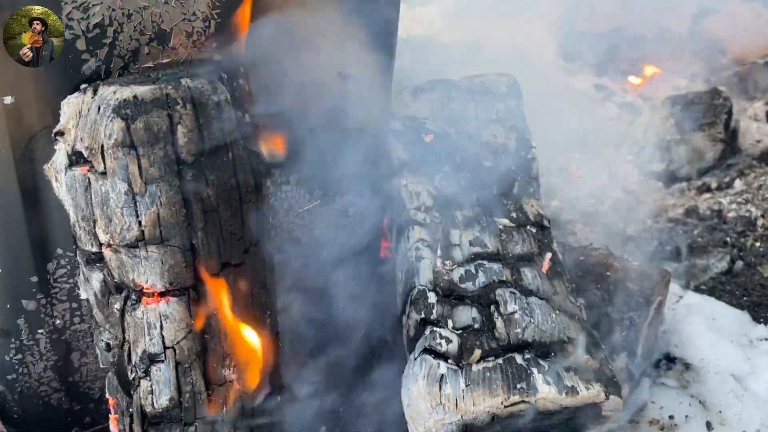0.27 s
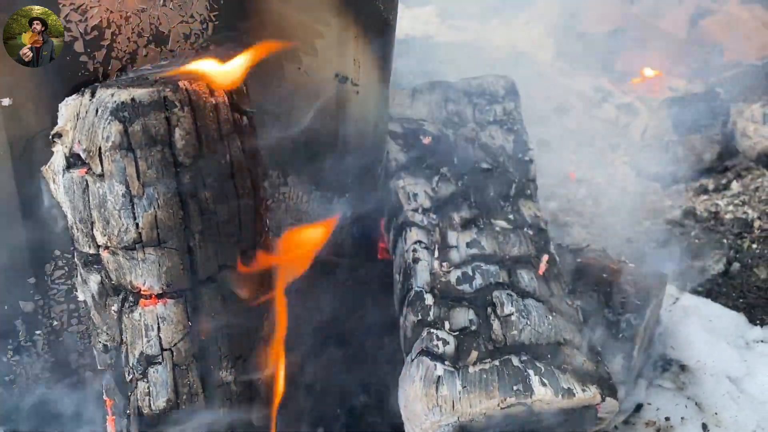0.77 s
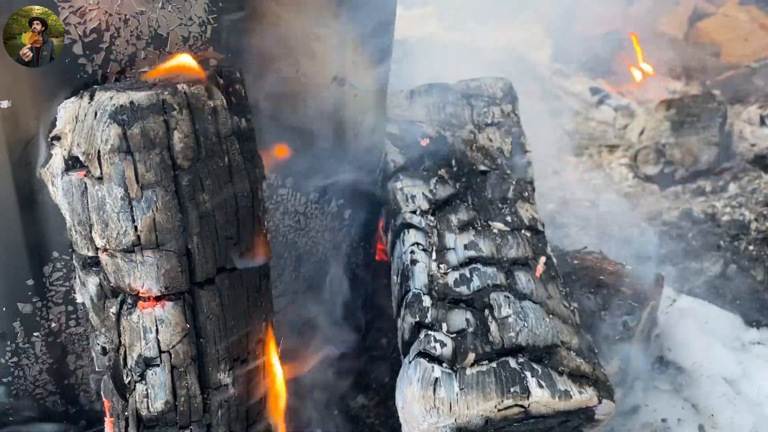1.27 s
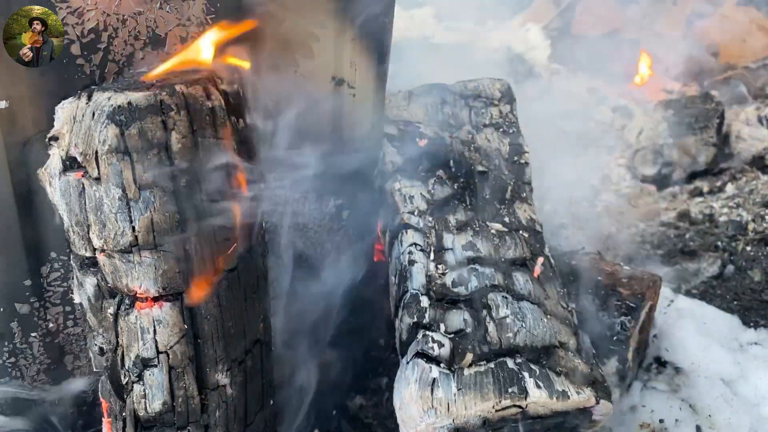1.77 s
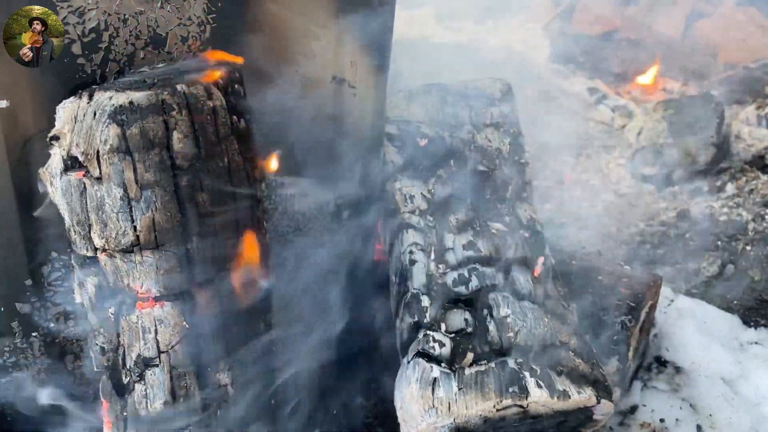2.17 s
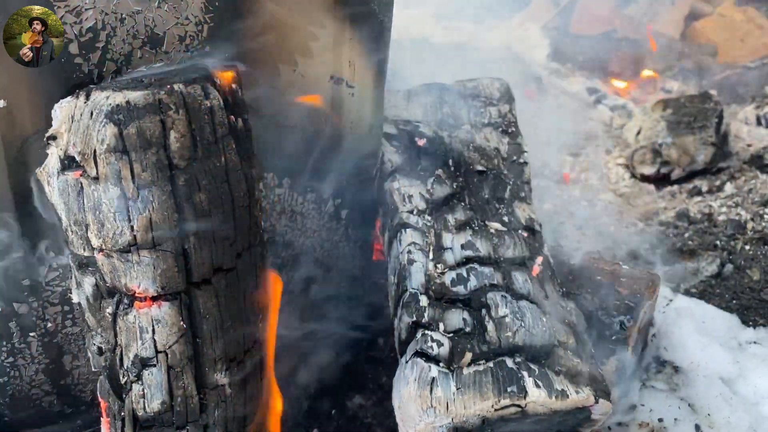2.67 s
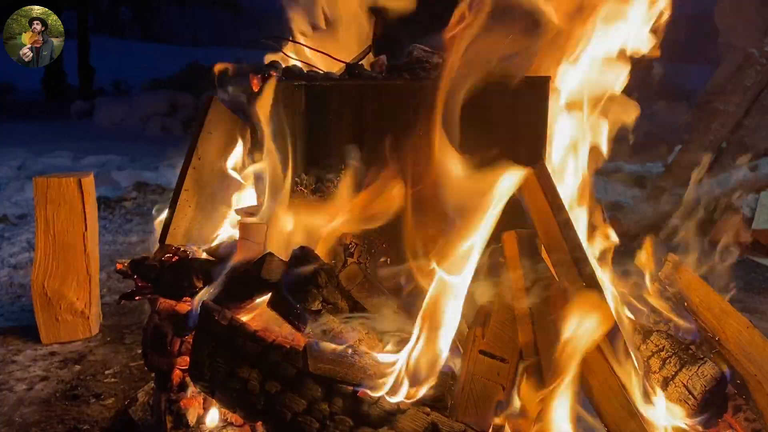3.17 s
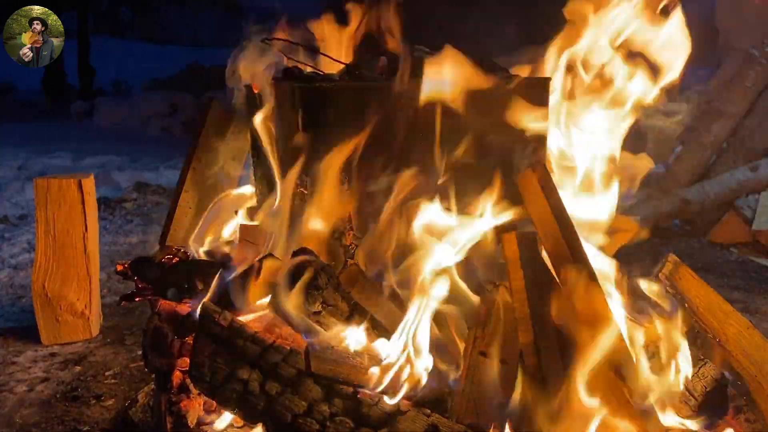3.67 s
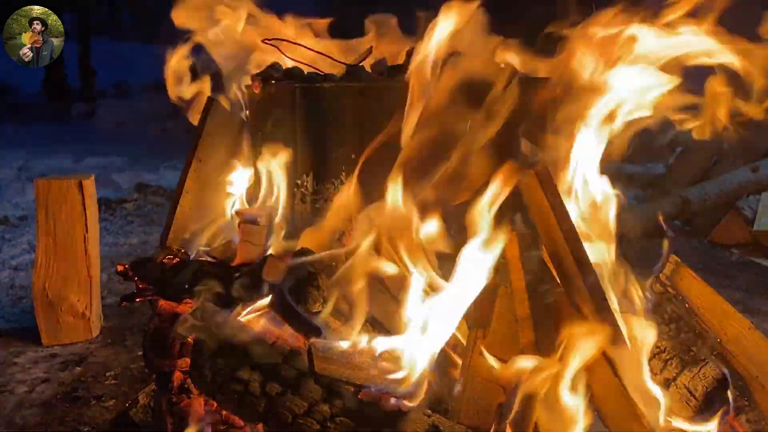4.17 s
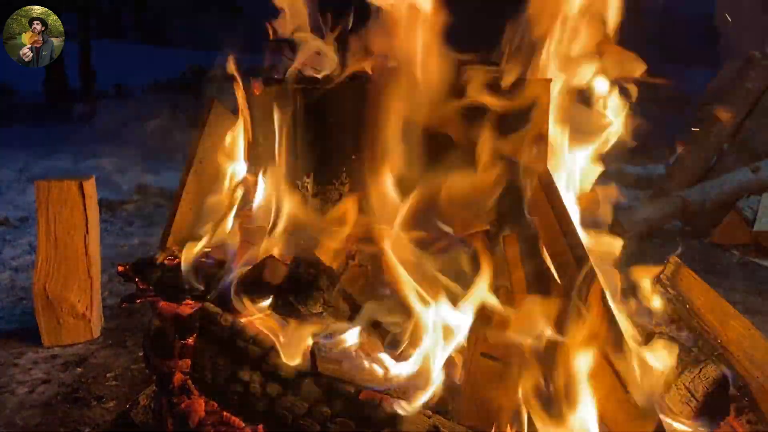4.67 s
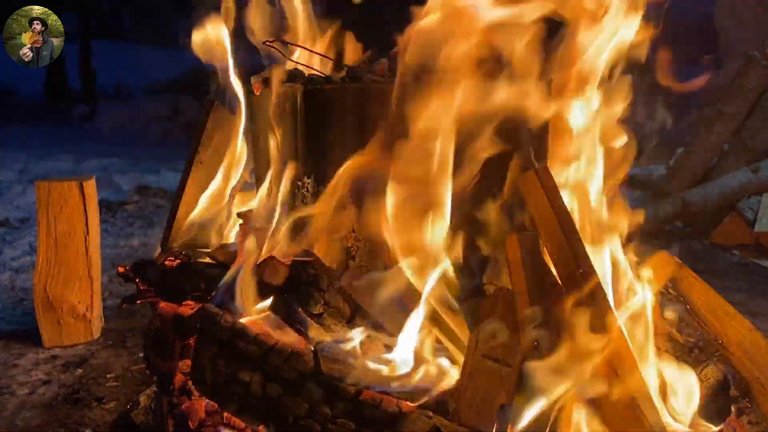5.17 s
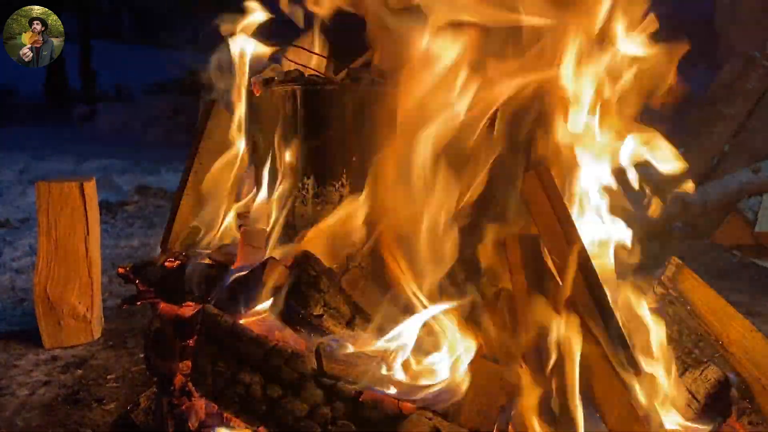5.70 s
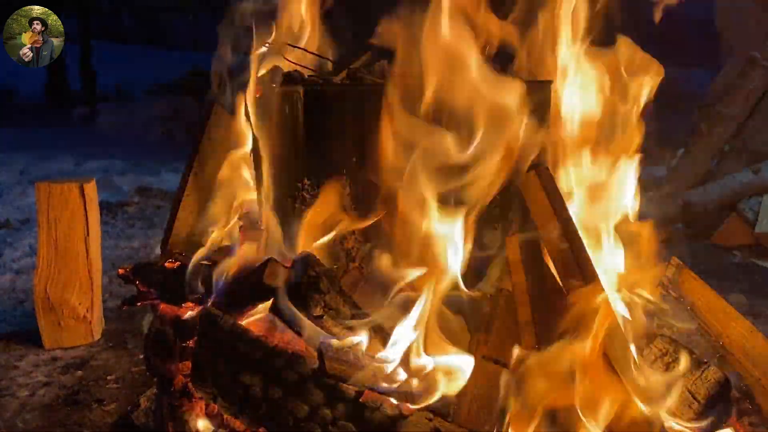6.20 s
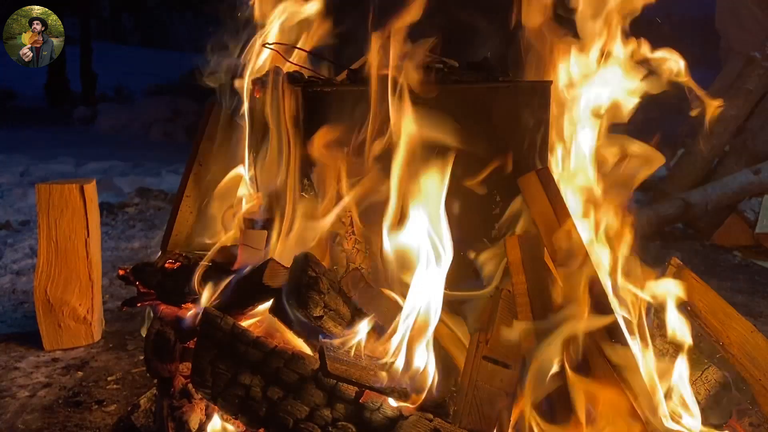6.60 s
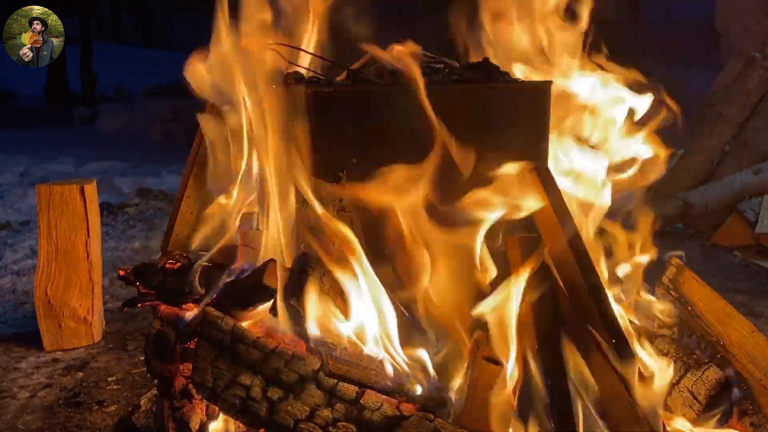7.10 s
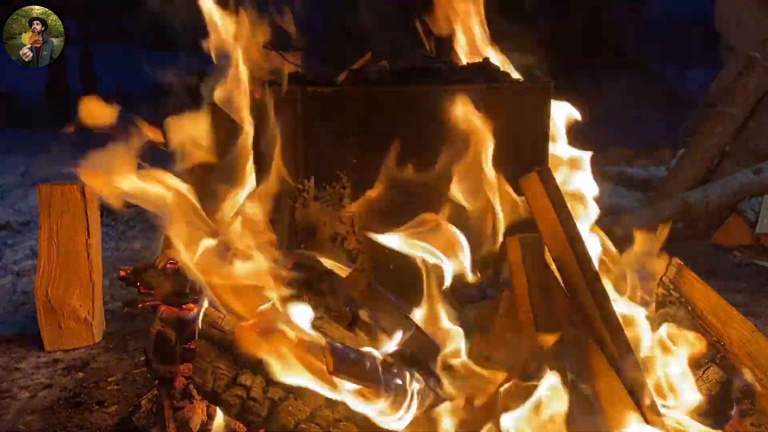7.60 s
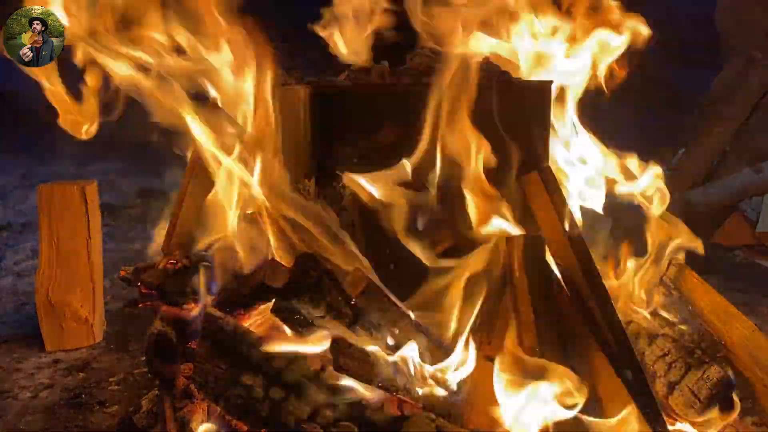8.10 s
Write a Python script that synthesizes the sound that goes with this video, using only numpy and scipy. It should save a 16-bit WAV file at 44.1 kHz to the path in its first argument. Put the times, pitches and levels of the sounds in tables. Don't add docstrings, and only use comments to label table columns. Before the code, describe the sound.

Smouldering logs give low fluttering rumble and sparse dry crackles, then an abrupt change to a louder full blaze with sharp pops and metallic knocks.

```python
import sys
import numpy as np
from scipy import signal
from scipy.fft import rfft, irfft, next_fast_len
from scipy.io import wavfile
from scipy.ndimage import uniform_filter1d

SR = 44100
rng = np.random.default_rng(int(sys.argv[2]) if len(sys.argv) > 2 else 0)


def how_loud(loudness_db):
    steps = np.asarray(loudness_db, float) / 20
    return 10 ** steps


def master(y):
    cut = np.clip(np.atleast_2d(y).T, -1, 1)
    pcm = np.round(cut * 32767)
    wavfile.write(sys.argv[1], SR, pcm.astype(np.int16))


N = 368182

# start in seconds, end in seconds.
PLACES_S = [
    (0, 3.104),
    (3.115, 8.35),
]
# time in seconds, level in dB.
SAP_LEVEL = [
    [(0.0, -65.5), (0.8, -66.5), (2.4, -66), (2.71, -67.5), (3.1, -64.5)],
    [(3.12, -63.5), (3.48, -61.5), (4.75, -61), (5.1, -62.5), (6.18, -59.5), (7.15, -60), (7.3, -56),
     (7.65, -62), (7.95, -60.5), (8.12, -54.5), (8.21, -62.5), (8.35, -62.5)],
]
# frequency in Hz, density in dB per Hz.
RUMBLE_SPECTRUM = [
    [(12, -62), (20, -19), (53, 3.5), (70, 8), (83, 2), (108, 5.5), (200, -8), (260, -55), (440, -120)],
    [(12, -42), (20, -49), (48, -1.5), (70, 4.5), (135, -5), (200, -15.5), (260, -24), (440, -120)],
]
EDGE_SPECTRUM = [
    [(90, -28), (160, -1), (260, -2.5), (430, -14), (600, -19), (950, -42.5), (1600, -36), (2500, -47)],
    [(90, 0.5), (160, 2), (260, -3.5), (430, -11), (600, -16), (1000, -21.5), (1500, -28), (2500, -33),
     (4000, -74)],
]
HISS_SPECTRUM = [
    [(500, -12), (1000, -7.5), (1500, -7.5), (2200, -3.5), (3100, -1.5), (4700, 1), (6300, 4), (7500, -2),
     (9000, 5), (11000, -0.5), (15760, 0.5), (15880, -55.5)],
    [(700, 3), (1500, 1.5), (2100, -2.5), (3100, 3.5), (3900, 1.5), (4700, 4), (6500, -0.5), (8000, 3.5),
     (11000, 1), (15760, 4), (15880, -56)],
]
# frequency in Hz, width in Hz, boost in dB.
BOX_HUM = [(744, 80, 4.), (1011, 60, 6.), (1233, 75, 3.)]
# frequency in Hz, left-right likeness 0-1, left lead in radians.
PORT_MATCH = [
    [(89, 1, 0.43), (463, 0.75, -0.59), (1010, 0.47, 1.57), (1650, 0.95, 2), (2360, 1, 1.3),
     (4470, 0.3, 0.87), (5800, 1, 1.37), (10000, 0.85, 0.058)],
    [(39, 1, 0.16), (147, 0.99, 0.061), (634, 0.98, 0.69), (1190, 0.88, 0.49), (1380, 0.1, 0.96),
     (2900, 0.7, 0.98), (4810, 0.68, 0.91), (5700, 0, 1.8), (7260, 0.91, 0.2)],
]
# frequency in Hz, left over right in dB.
LEFT_LEAN = [
    [(300, 0.5), (950, 1), (1550, 0.3), (3000, 6.5), (6200, 0.3)],
    [(100, -0.5), (430, -2), (800, 2), (1050, 1), (4400, 4), (6200, 1)],
]
# start in seconds, peak in dB, pitch in Hz, decay in cycles.
PUFFS = [(0.234, -35, 100, 3.2), (0.264, -34, 63, 8.1), (0.637, -31, 67, 5), (0.8, -21.5, 56.4, 1.9),
         (0.953, -20, 45.8, 1.4), (0.955, -16.5, 79, 3), (1.055, -17.5, 67, 2.9), (1.304, -30, 102, 2.2),
         (1.564, -34, 120, 2.9), (1.924, -38, 115, 3.7), (2.157, -24.5, 63.3, 1.5), (2.302, -34, 127, 2.5),
         (2.622, -32, 157, 5.1), (2.842, -28, 111, 3.6), (3.119, -27, 47, 0.83), (3.12, -32, 64, 1.4),
         (3.935, -21, 82, 1.9), (4.329, -22, 62, 2.2), (4.549, -37, 91.5, 4.3), (5.881, -20.5, 67, 3.4),
         (6.017, -42, 103, 3), (6.639, -15.5, 83.5, 2.1), (6.91, -11.5, 77.5, 1.8),
         (7.249, -14.5, 80, 1.95), (7.559, -16, 82, 3), (8.239, -19, 66.6, 0.82)]
# start in seconds, peak in dB, favoured pitch in Hz, splinters in dB.
KNOCKS = [
    (3.5745, -33.5, 1250, -20),
    (4.8494, -34, 1050, -8),
    (4.8582, -21.5, 1060, -11),
    (5.145, -17.5, 3500, -14),
    (5.1457, -29.5, 950, -10),
    (5.1487, -23, 960, -12.5),
    (6.222, -37.5, 1100, 1.5),
    (6.529, -44, 1500, -12),
    (7.195, -39, 1620, -28),
    (7.785, -39.5, 800, -1.5),
]
# frequency in Hz, level in dB, 60 dB decay in seconds.
BOX_MODES = [(740, 2.5, 0.044), (1010, 3.5, 0.032), (1215, -7, 0.043), (1700, -11.5, 0.078),
             (2600, -11, 0.042), (3430, -1, 0.017), (3900, -2, 0.013), (5320, -6, 0.018), (7400, -22, .012)]
# start in seconds, peak in dB, sharpness in dB.
LOG_TEARS = [(.025, -40, -18.5), (.24, -42, -26.5), (.31, -46, -18), (.366, -40, -28), (.444, -43, -26.5),
             (2.05, -48, -23), (2.352, -41, -12.5), (0.293, -62, -16), (0.417, -32.5, -22.5),
             (0.7, -39, -15), (0.746, -42, -19.5), (0.936, -44, -22.5), (1.086, -25, -50),
             (1.174, -35, -26), (1.314, -26.5, -26), (1.358, -36.5, -18.5), (1.559, -42, -19),
             (1.699, -39, -24.5), (1.776, -46, -5.5), (1.822, -42.5, -12), (1.886, -42.5, -21),
             (1.918, -41, -8), (2.112, -43, -9), (2.255, -36.5, -24), (2.306, -30, -21),
             (2.327, -29.5, -11.5), (2.637, -44, -18.5), (2.845, -39.5, -18.5)]
# start in seconds, peak in dB, sharpness in dB.
BLAZE_TEARS = [(3.161, -42.5, -19), (3.213, -42, -18), (3.345, -34.5, -16.5), (3.469, -41, -18),
               (3.558, -35.5, -18), (3.617, -43, -17), (3.709, -39.5, -18), (3.812, -42, -18),
               (3.878, -47, -17), (4.069, -38, -17.5), (4.112, -40.5, -17.5), (4.149, -46, -16),
               (4.169, -42, -19.5), (4.333, -43, -17), (4.404, -33, -17.5), (4.5, -37.5, -16.5),
               (4.945, -46, -15.5), (4.995, -39, -20.5), (5.076, -47, -20), (5.391, -40, -18),
               (5.469, -43.5, -18), (5.694, -42, -17), (6.057, -37.5, -17.5), (6.565, -37, -19),
               (6.842, -39.5, -18), (7.665, -44, -18.5), (8.102, -32.5, -16), (8.138, -40, -17.5)]
# start in seconds, peak in dB, sharpness in dB.
FAINT_TEARS = [(0.336, -51, -22.5), (0.475, -54, -21), (1.038, -47.5, -23), (1.287, -59, -25),
               (2.496, -51, -25), (2.532, -49, -24), (2.564, -45, -24.5), (2.733, -59, -26),
               (2.769, -61, -25), (2.899, -55, -24.5), (2.95, -55, -24), (3.056, -50, -25)]
# start in seconds, length in seconds, level in dB, spectrum of frequency in Hz and density in dB.
STEAM_JET = (.525, 0.28, -60, [(400, -20), (700, -4), (820, -1), (1000, -13), (1600, -13), (2500, -27)])
# rumble in dB, ragged edge in dB.
CALM_DB = [
    (-59, -77),
    (-43, -49.5),
]
# middle in seconds, half length in seconds, rumble in dB, edge over rumble in dB.
GUSTS = [(0.015, 0.057, -43, -9.5), (0.256, 0.025, -49, -2), (0.374, 0.1, -45, -7),
         (0.533, 0.064, -49.5, -4.5), (0.74, 0.09, -49, -7.5), (0.94, 0.045, -36, -22),
         (1.103, 0.065, -34.5, -22.5), (1.325, 0.057, -48, -2), (1.572, 0.027, -48.5, -1.5),
         (1.746, 0.11, -55, -5), (2, 0.13, -59.5, -8), (2.16, 0.07, -48, -6.5), (2.335, 0.051, -50.5, 3.5),
         (2.403, 0.023, -41.5, -12), (2.582, 0.11, -59, 3.5), (2.858, 0.077, -48.5, -7),
         (3.103, 0.06, -54.5, -6), (3.345, 0.04, -37.5, -15.5), (3.643, 0.13, -46.5, -4),
         (3.952, 1, -50, -7), (4.385, 0.08, -51.5, 2), (4.737, 0.15, -50, -24), (5.035, 0.19, -45.5, -8),
         (5.336, 0.06, -48.5, -4), (5.695, 0.053, -40.5, -14.5), (6.123, 0.25, -40.5, -13),
         (6.746, 0.22, -42.5, -16.5), (7.188, 0.18, -47.5, -43), (7.57, 0.086, -41.5, -9.5),
         (7.728, 0.052, -42.5, -5.5), (8.226, 0.19, -48, -5.5)]
# start in seconds, peak in dB, low and high share in dB over the middle, cell pitch in Hz.
LOG_SNAPS = [(.0882, -35.5, -6, -11, 1630), (.0888, -27.5, -18, -9, 6580), (.2248, -31.5, -16, 3, 7170),
             (.31, -31.5, -39, -12, 6170), (.3738, -26, -20, 6, 7730), (.434, -29.5, -8, 7, 7900),
             (.602, -34, 6, 15, 9000), (.863, -34, -21, 2, 5400), (.8765, -23.5, -31, -10.5, 7640),
             (1.272, -23, -30, 6, 6940), (1.5132, -27, -13, 6, 3800), (1.5176, -26.5, -30, 5, 10000),
             (1.5274, -21, -19.5, -15.5, 7100), (1.5602, -32, -11, -25, 3630),
             (1.5823, -36.5, -8, -5, 7500), (2.0038, -34, -19, 6, 5440), (2.0692, -31, -11, -9, 3060),
             (2.1807, -22.5, -10.5, -4.5, 6590), (2.34, -26.5, -56, -7, 7370),
             (2.4029, -29.5, -20, 12, 6960), (2.4517, -30.5, -34, -7, 6770), (2.907, -28.5, -15, 2, 4520),
             (3.0375, -35.5, -6, -8, 6590)]
# start in seconds, peak in dB, low and high share in dB over the middle, cell pitch in Hz.
BLAZE_SNAPS = [(3.347, -17, -2.5, -7, 5650), (3.4024, -23.5, 3.5, 7.5, 1840), (3.779, -13.5, 1.5, -6, 2750),
               (4.0347, -24.5, -9, -7, 6800), (4.07, -19, 0.5, -8, 6400), (4.277, -27.5, -3, 12, 1660),
               (4.29, -34, -2, -36, 4470), (4.414, -24.5, -19, 1, 3640), (4.5012, -22.5, 3, -1.5, 6400),
               (4.8358, -14.5, -9, -3.5, 15200), (4.8571, -26.5, -16, -9, 3000),
               (5.146, -21.5, -6, 4, 3700), (5.2585, -18.5, -3, 3.5, 5300), (5.304, -30.5, -18, -11, 4370),
               (5.3873, -31, -11, -19, 7300), (5.73, -16, -0.5, 2, 3860), (5.7475, -19, -1.5, 8, 7430),
               (5.951, -24, -13, -0.5, 5320), (6.0764, -24.5, -8, -3.5, 3380), (6.379, -20.5, -27, 0, 4490),
               (6.4517, -28, -17, -14, 3000), (6.5281, -27, 7, -11.5, 6550), (6.8061, -11.5, -1, 0.5, 7400),
               (6.8592, -21, -3, 5, 7200), (7.1517, -25.5, -11, -8.5, 3960), (7.455, -26, 9, 2.5, 5000),
               (8.104, -15.5, -1, -4.5, 3030)]
# start in seconds, peak in dB, cell pitch in Hz.
BLAZE_TICKS = [(3.202, -34, 2570), (3.274, -33, 7600), (3.29, -31.5, 2720), (3.388, -42, 5220),
               (3.501, -30, 7790), (3.559, -44, 1960), (3.632, -33, 4280), (3.758, -36, 3070),
               (3.818, -36, 2540), (3.906, -43, 4910), (4.0577, -37, 5000), (4.164, -33.5, 4520),
               (4.553, -33, 3900), (4.635, -31, 3500), (4.756, -28, 6900), (4.777, -29, 3820),
               (4.822, -26, 6380), (4.8403, -24, 6500), (5.081, -33.5, 3630), (5.445, -31.5, 4560),
               (5.717, -28, 7420), (5.779, -29, 7570), (5.811, -30, 9000), (5.8688, -31.5, 1920),
               (5.891, -31, 3550), (6.029, -35, 2820), (6.056, -37, 2060), (6.1026, -31, 3120),
               (6.186, -40, 4390), (6.2256, -34, 3970), (6.25, -33, 7500), (6.27, -26, 4300),
               (6.358, -31, 7820), (6.634, -26, 4810), (6.6555, -30, 7850), (6.7238, -29, 9000),
               (6.7446, -26.5, 7540), (6.766, -29.5, 4280), (6.8807, -30.5, 3500), (6.916, -34, 4550),
               (6.95, -36.5, 3180), (7.095, -37, 1570), (7.137, -40, 4450), (7.357, -29.5, 7520),
               (7.443, -30, 2490), (7.532, -35, 2940), (7.541, -29, 10000), (7.547, -30.5, 2600),
               (7.598, -28.5, 2440), (7.654, -33, 2430), (7.701, -44, 7290), (7.7383, -34, 5000),
               (7.748, -29, 11000), (7.785, -34, 5000), (7.797, -40, 2500), (7.851, -29.5, 7540),
               (7.973, -37, 7310), (8.035, -33, 1700), (8.1648, -32.5, 6000)]
# start in seconds, peak in dB, cell pitch in Hz.
EMBER_TICKS = [(.1335, -50, 6040), (.157, -43, 4850), (.2, -49, 6060), (0.3494, -35, 7360),
               (.5625, -44, 7820), (.582, -43, 6110), (.909, -40, 4890), (1.153, -41, 6210),
               (1.185, -37, 4390), (1.349, -43, 6250), (1.441, -39, 6610), (1.468, -40, 4760),
               (1.598, -35, 7500), (1.927, -36.5, 2490), (2.027, -54, 3000), (2.0688, -44, 4150),
               (2.11, -36, 4590), (2.12, -37, 2700), (2.169, -32, 8500), (2.188, -33, 5000),
               (2.2185, -39, 6270), (2.247, -42, 4780), (2.293, -43, 3000), (2.552, -35, 6470),
               (2.597, -44, 5620), (2.696, -47, 6960)]
FIZZ_HZ = [2000, 4000, 7500, 13000]

EDGE_HZ = 16750
TURN_HZ, LAG_SAMPLES = 1.5 * SR / 10, 10
TICK_LOW_DB, TICK_HIGH_DB, TICK_DULL_DB_PER_OCT = -5, 0.5, 4
CELL_DB, CELL_WIDTH_OCT, CELL_LOW_DB_PER_OCT = 4, 0.23, 2
SHOCK = 1.35
SWING_UP_CYCLES = 0.2
TEAR_LIFT_DB, TEAR_ROUGH = 6, 0.55


def evened(x):
    return x / np.sqrt(np.mean(x ** 2) + 1e-20)


def read(points, hz, column=1):
    table = np.array(points, float)
    return np.interp(np.log(hz + 1), np.log(table[:, 0] + 1), table[:, column])


def add(mix, start_s, sound):
    part = mix[..., max(round(start_s * SR), 0):][..., :sound.shape[-1]]
    part += sound[..., :part.shape[-1]]


def flicker(count, corner_hz):
    hz = np.fft.rfftfreq(count, 1 / SR)
    shape = hz / (hz + 3) / (1 + (hz / corner_hz) ** 2)
    return evened(irfft(rfft(rng.standard_normal(count)) * shape, count))


def noise(count, spectrum, peaks=()):
    hz = np.fft.rfftfreq(count, 1 / SR)
    db = read(spectrum, hz)
    for peak_hz, width_hz, peak_db in peaks:
        db = db + peak_db / (1 + (2 * (hz - peak_hz) / width_hz) ** 2)
    return evened(irfft(rfft(rng.standard_normal((2, count))) * how_loud(db), count))


def ports(near, other, place):
    hz = np.fft.rfftfreq(len(near), 1 / SR)
    same = np.clip(read(PORT_MATCH[place], hz), 0, 1)
    a, b = rfft(near), rfft(other)
    lean = how_loud(read(LEFT_LEAN[place], hz) / 2)
    left = a * lean * np.exp(1j * read(PORT_MATCH[place], hz, column=2))
    right = (same * a + np.sqrt(1 - same ** 2) * b) / lean
    return irfft(np.array([left, right]), len(near))


def air():
    return how_loud(-77.0) * noise(next_fast_len(N), HISS_SPECTRUM[0])[:, :N]


def sap(t, place, fizz_per_s, fizz_db, spread_db):
    time_s, hiss_db = np.transpose(SAP_LEVEL[place])
    hz = np.fft.rfftfreq(len(t), 1 / SR)
    hiss = rfft(noise(len(t), HISS_SPECTRUM[place]))
    decay = np.exp(-1 / (0.0015 * SR))
    out = 0
    for share in np.eye(len(FIZZ_HZ)):
        draw = rng.random(len(t))
        size = np.minimum(rng.exponential(1, len(t)), 4)
        bursts = (draw < fizz_per_s / SR) * how_loud(fizz_db + spread_db * size)
        fizz = signal.lfilter([1], [1, -decay], bursts)
        band = irfft(hiss * read(np.transpose([FIZZ_HZ, share]), hz), len(t))
        out = out + (1 + fizz) * how_loud(1.27 * flicker(len(t), 10.0)) * band
    return how_loud(np.interp(t, time_s, hiss_db) + 4.0 + 0.97 * flicker(len(t), 6.8)) * out


def steam_jet():
    out = np.zeros((2, N))
    start_s, length_s, db, spectrum = STEAM_JET
    t = np.arange(8192) / SR
    swell = how_loud(db - 20 * t / length_s) * (1 - np.exp(-t / 0.003))
    add(out, start_s, swell * noise(len(t), spectrum) * (t < length_s))
    return out


def knocks():
    out, t = np.zeros((2, N)), np.arange(3000) / SR
    splinter_band = signal.butter(2, [2000, 5500], "band", fs=SR)
    grits = rng.standard_normal((len(KNOCKS), 2, len(t)))
    for (start_s, db, blow_hz, splinter_db), grit in zip(KNOCKS, grits):
        ring = np.zeros(len(t))
        for hz, mode_db, t60_s in BOX_MODES:
            level = how_loud(mode_db - 13.5 * np.log2(hz / blow_hz) ** 2 - 60 * t / t60_s)
            ring += level * np.sin(2 * np.pi * hz * t) * (1 - np.exp(-hz * t / SWING_UP_CYCLES))
        blow = (t == 0) + 0.03 * grit * how_loud(-60 * t / 0.008)
        sound = signal.fftconvolve(blow, ring[None], axes=1)[:, :len(t)]
        splinters = evened(signal.lfilter(*splinter_band, grit)) * how_loud(splinter_db - 60 * t / 0.034)
        add(out, start_s, how_loud(db - 2.5) * (sound / abs(sound).max() + splinters))
    return out


def snaps():
    out, t = np.zeros((2, N)), np.arange(2048) / SR - 0.002
    hz = np.fft.rfftfreq(len(t), 1 / SR)
    after = np.maximum(t, 0)
    rows = LOG_SNAPS + BLAZE_SNAPS
    for start_s, db, cell_hz in BLAZE_TICKS + EMBER_TICKS:
        high_db = TICK_HIGH_DB + TICK_DULL_DB_PER_OCT * np.log2(cell_hz / 7000)
        rows = rows + [(start_s, db, TICK_LOW_DB, high_db, cell_hz)]
    rows = sorted(rows)
    gases = rng.standard_normal((len(rows), 2, 2, len(t)))
    for (start_s, db, low_db, high_db, cell_hz), gas in zip(rows, gases):
        burst = gas[0] * (1 - np.exp(-(after / 0.00052) ** 2)) * how_loud(-60 * after / 0.0022)
        scatter = gas[1] * (t > 0.0008) * how_loud(-14 - 60 * after / 0.016)
        tilt = [(400, low_db - 14), (900, low_db), (2000, low_db + 2.5), (5500, 0),
                (11000, high_db + 6.5), (15500, 1.17 * high_db + 6.5)]
        cell_db = CELL_DB + CELL_LOW_DB_PER_OCT * max(np.log2(7000 / cell_hz), 0)
        cell = cell_db * np.exp(-(np.log2((hz + 1) / cell_hz) / CELL_WIDTH_OCT) ** 2)
        colour = how_loud(read(tilt, hz) + cell)
        flat = rfft(burst) / np.sqrt(uniform_filter1d(abs(rfft(burst)) ** 2, size=24))
        flat = rfft(irfft(flat) * np.exp(-((t - 0.0005) / 0.001) ** 2))
        flat = flat + SHOCK * np.exp(-2j * np.pi * hz * 0.0025)
        dull = rfft(scatter) / (1 + (hz / 8000) ** 2)
        sound = irfft((flat * np.linalg.norm(burst[0]) + dull) * colour)
        add(out, start_s - 0.002, how_loud(db + 3.5) * sound / abs(sound).max())
    return out


def tears():
    out, t = np.zeros(next_fast_len(N)), np.arange(1300) / SR
    lifted = [(start_s, db + TEAR_LIFT_DB, sharp_db) for start_s, db, sharp_db in BLAZE_TEARS + FAINT_TEARS]
    rows = LOG_TEARS + lifted
    for (start_s, db, sharp_db), gas in zip(rows, rng.standard_normal((len(rows), len(t)))):
        hz = 1500 * 2 ** ((sharp_db + 12.5) / 14)
        turns = hz * 0.00131 * np.log(1 + t / 0.001324) + 160 * t
        gas_band = signal.butter(4, [120, 0.54 * hz + 200], "band", fs=SR, output="sos")
        torn = evened(signal.sosfilt(gas_band, gas))
        plop = np.sin(2 * np.pi * turns) + TEAR_ROUGH * torn * np.exp(-t / 0.0062)
        envelope = (1 - np.exp(-(t / 0.0022) ** 2)) * np.exp(-t / 0.0052)
        add(out, start_s, how_loud(db - 3) * envelope * plop)
    late = np.arange(len(out)) > PLACES_S[1][0] * SR
    embers, blaze = out * ~late, out * late
    both = ports(embers, np.roll(embers, shift=30), 0) + ports(blaze, np.roll(blaze, shift=30), 1)
    return both[:, :N]


def puffs():
    out = np.zeros(N)
    for (start_s, db, hz, cycles), sign in zip(PUFFS, rng.choice([-1, 1], len(PUFFS))):
        turns = np.arange(int(SR * 3 * cycles / hz)) * hz / SR
        shape = (1 - np.exp(-turns / 0.43)) * np.exp(-(turns / cycles) ** 2)
        tone = np.sin(2 * np.pi * turns / (1 + 0.013 * turns))
        add(out, start_s + 0.0042, sign * how_loud(db - 7.5) * shape * tone)
    return np.array([out, np.roll(out, shift=150)])


def draught(t, place):
    start_s, end_s = PLACES_S[place]
    rumble, edge = how_loud(np.array(CALM_DB[place]))
    for middle_s, half_s, db, ragged_db in GUSTS:
        bell = how_loud(db) * np.exp(-((t - middle_s) / half_s) ** 2) * (start_s <= middle_s < end_s)
        rumble, edge = rumble + bell, edge + how_loud(ragged_db) * bell
    return rumble, edge


def flame(t, place, body_db, edge_db):
    rumble, ragged = draught(t, place)
    flap, tear = flicker(len(t), 11.8), flicker(len(t), 94)
    body = noise(len(t), RUMBLE_SPECTRUM[place]) * evened(how_loud(body_db * flap))
    edge = noise(len(t), EDGE_SPECTRUM[place], BOX_HUM if place else ())
    edge = edge * evened(how_loud(edge_db * (1.2 * flap + tear)))
    return rumble * body + how_loud(1.0) * ragged * edge


def scene():
    hits, out = snaps() + knocks() + puffs() + steam_jet(), np.zeros((2, N))
    hits = np.pad(hits, ((0, 0), (0, SR // 5)))
    # flap in dB, tear in dB, fizz per second, fizz in dB, fizz spread in dB.
    lively = [(4.3, 3.24, 99, -0.5, 3.65), (0.66, 1.6, 157, -0.36, 1.3)]
    for place, (start_s, end_s) in enumerate(PLACES_S):
        t = start_s + np.arange(next_fast_len(round((end_s - start_s) * SR))) / SR
        body_db, edge_db, *fizz = lively[place]
        heard = flame(t, place, body_db, edge_db) + sap(t, place, *fizz)
        heard = heard + hits[:, round(start_s * SR):][:, :len(t)]
        fade = np.clip(np.minimum(t - start_s + 1 - place, end_s - t + place) / 0.0016, 0, 1)
        add(out, start_s, ports(*heard, place) * fade)
    return out + air() + tears()


def roll_off(x):
    return signal.sosfilt(signal.butter(12, 17150, fs=SR, output="sos"), x)


def record(dry):
    size = next_fast_len(N)
    hz = np.fft.rfftfreq(size, 1 / SR)
    lag = np.exp(-2j * np.pi * np.maximum(hz - TURN_HZ, 0) * LAG_SAMPLES / SR)
    edge = np.clip((EDGE_HZ - hz) / 300, 0, 1)
    wide = irfft(rfft(dry, size) * edge * np.array([lag, np.ones(len(hz))]), size)[:, :N]
    return roll_off(wide)


dry = scene()
out = record(dry)
master(out)
```